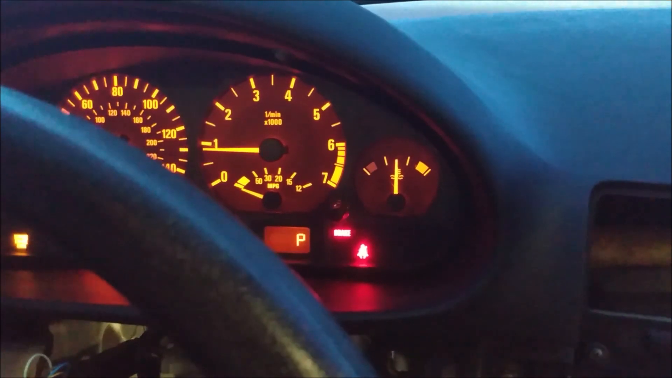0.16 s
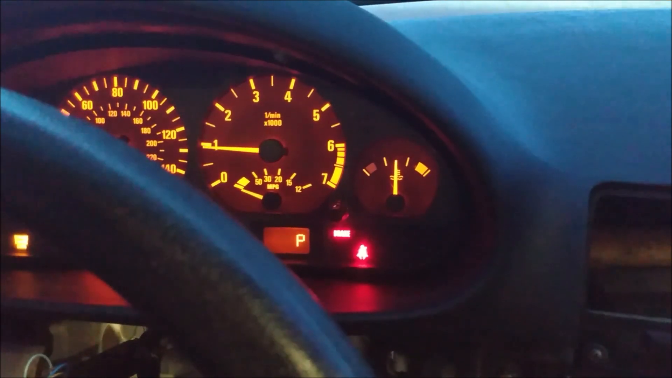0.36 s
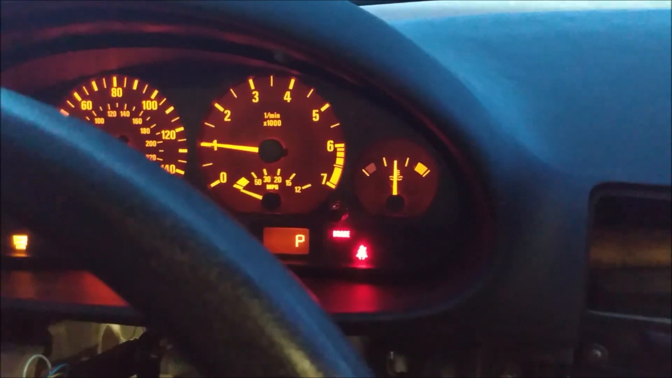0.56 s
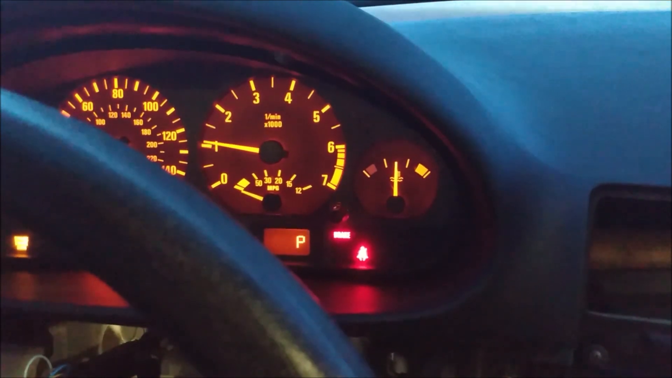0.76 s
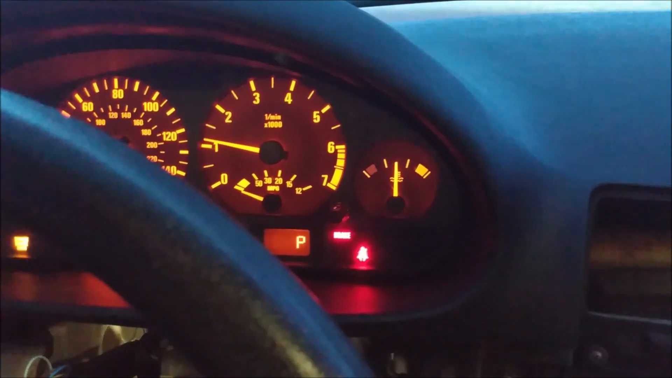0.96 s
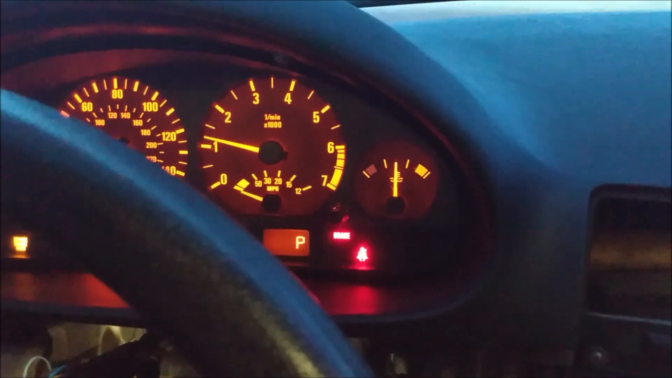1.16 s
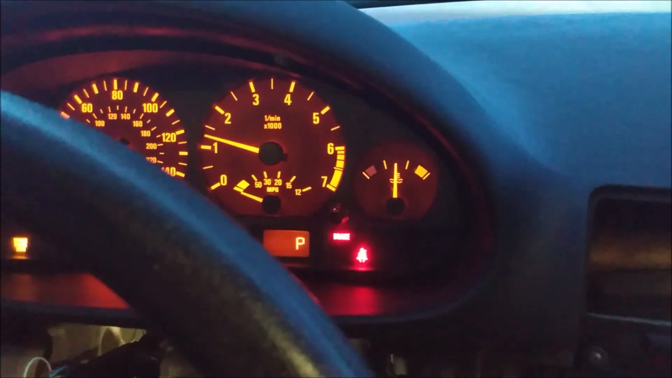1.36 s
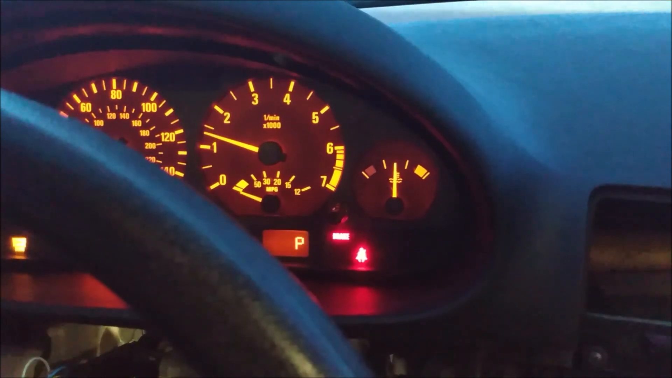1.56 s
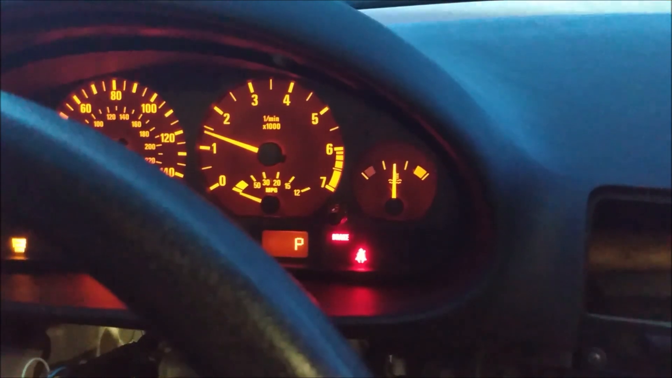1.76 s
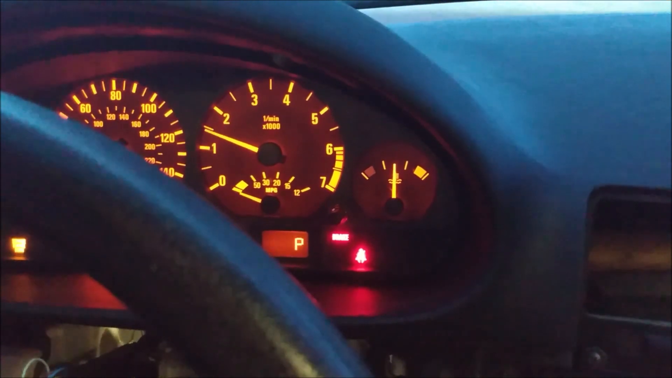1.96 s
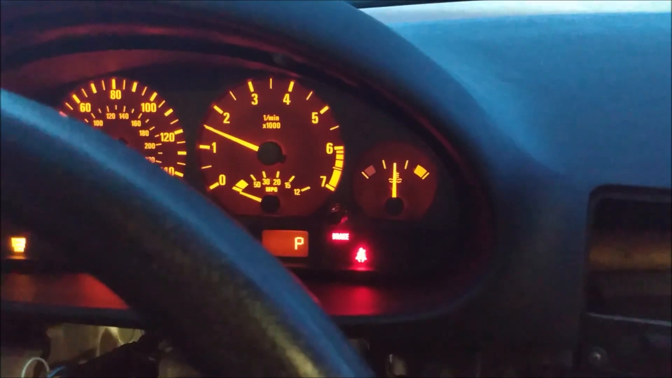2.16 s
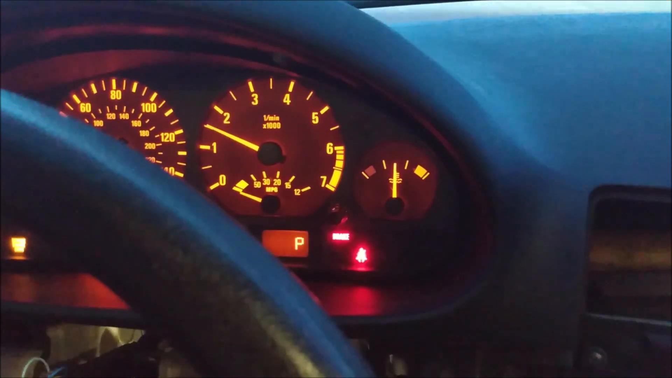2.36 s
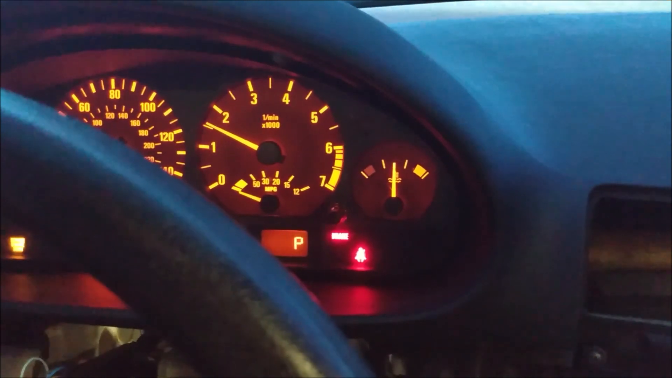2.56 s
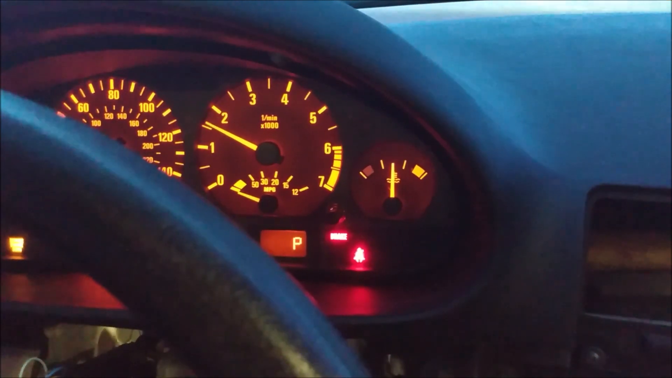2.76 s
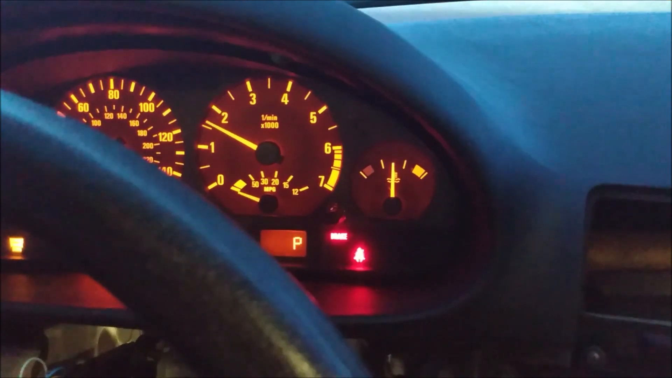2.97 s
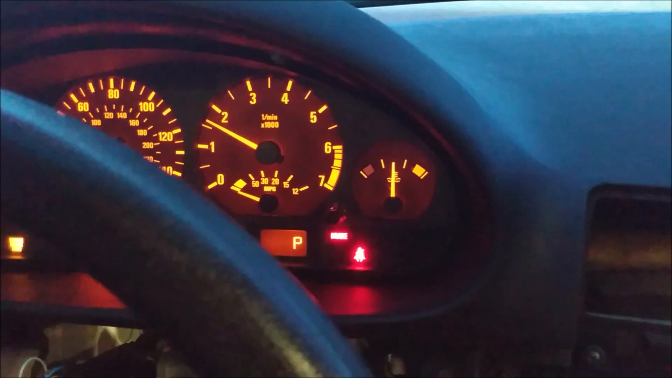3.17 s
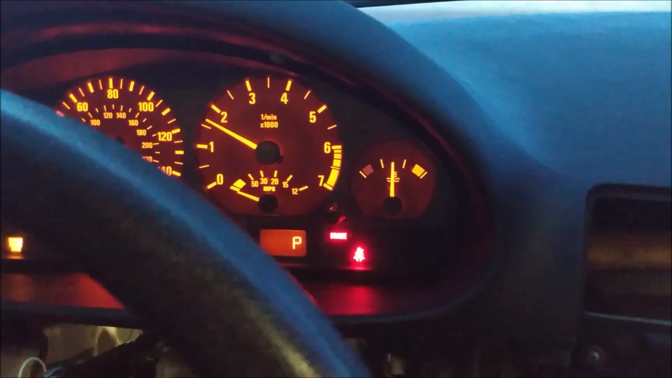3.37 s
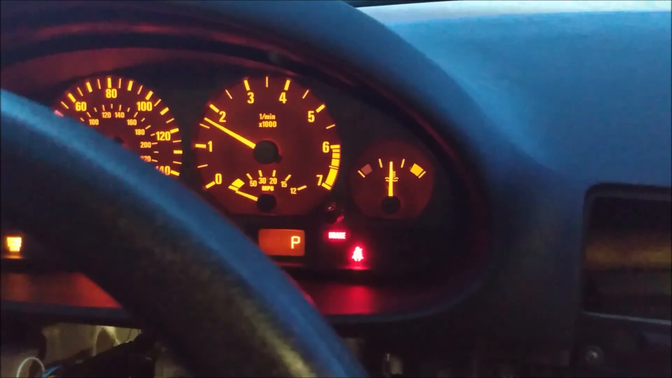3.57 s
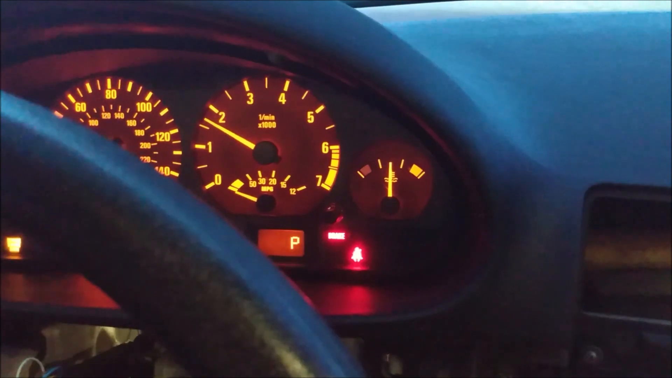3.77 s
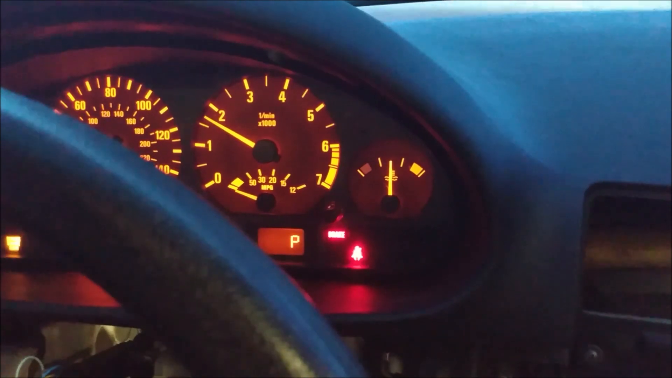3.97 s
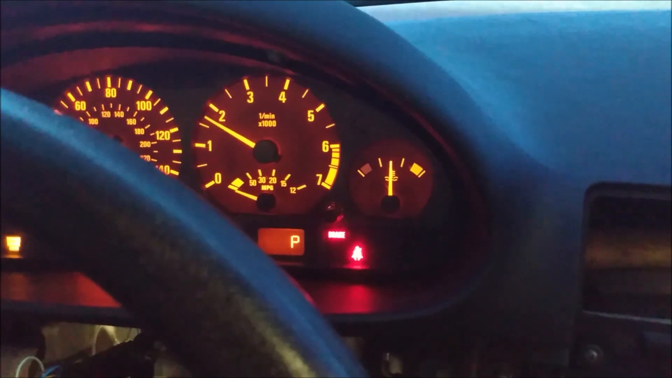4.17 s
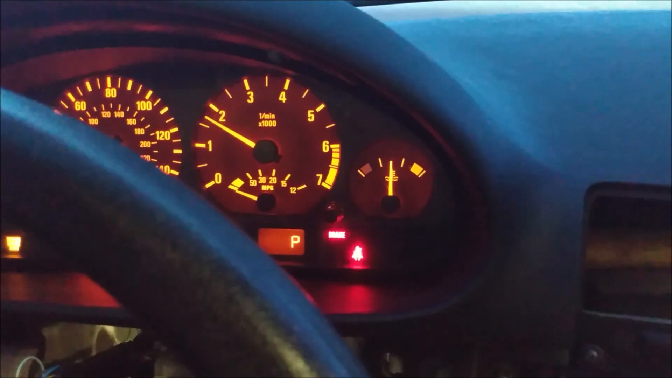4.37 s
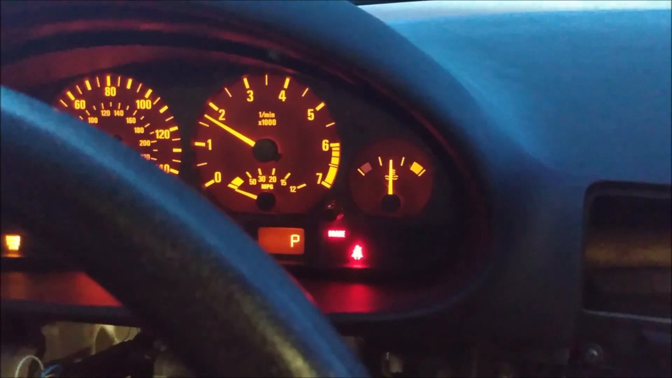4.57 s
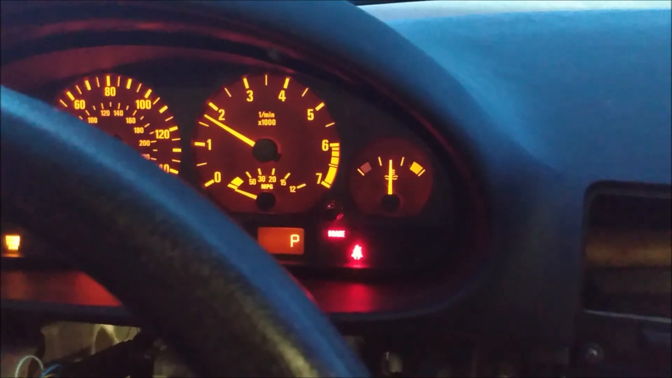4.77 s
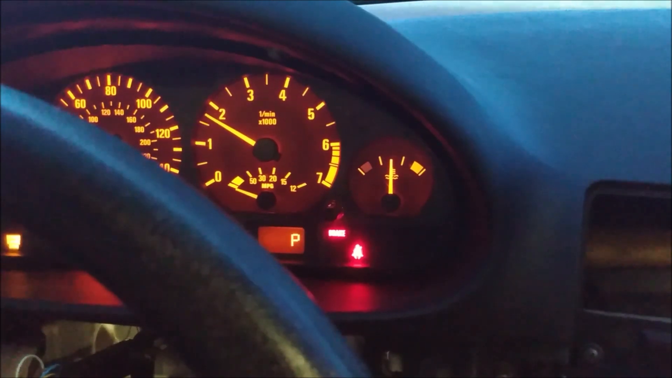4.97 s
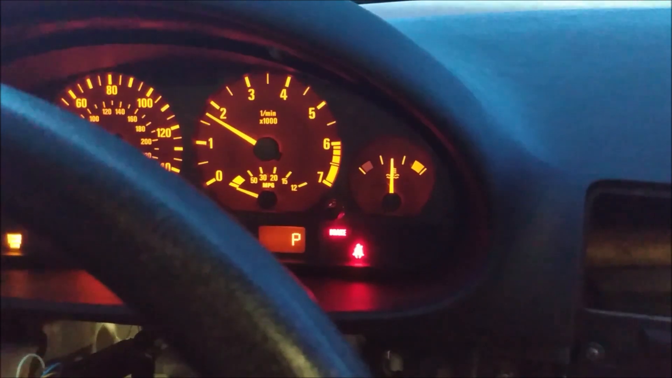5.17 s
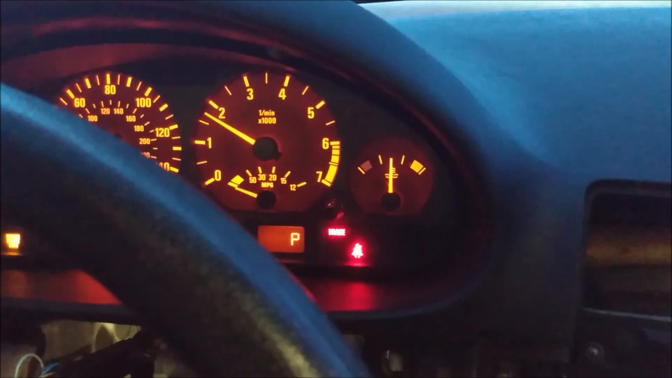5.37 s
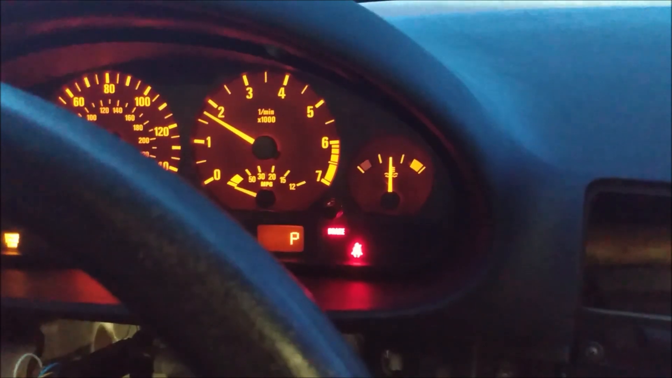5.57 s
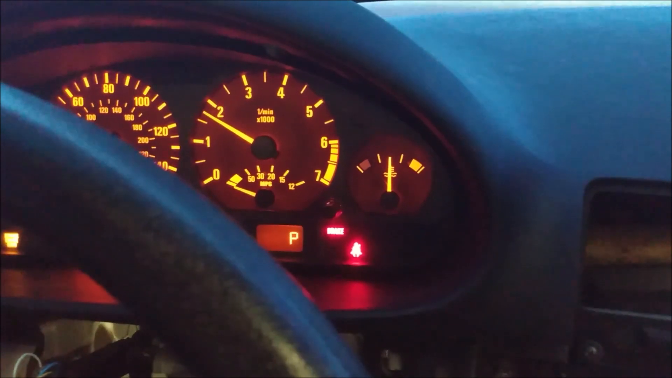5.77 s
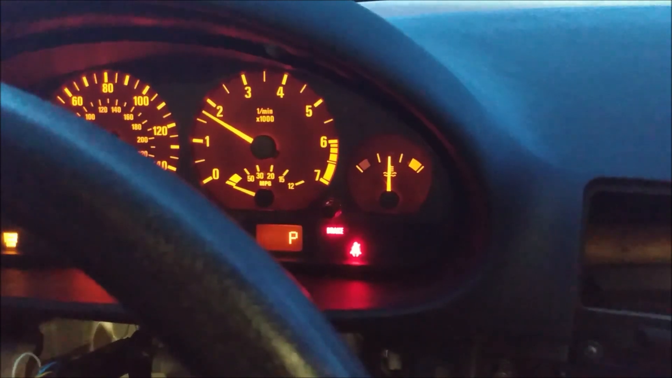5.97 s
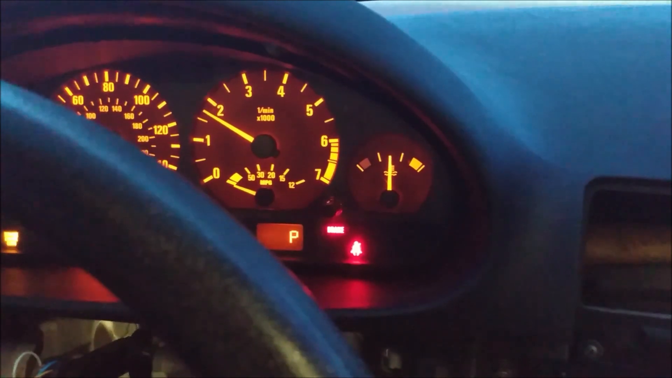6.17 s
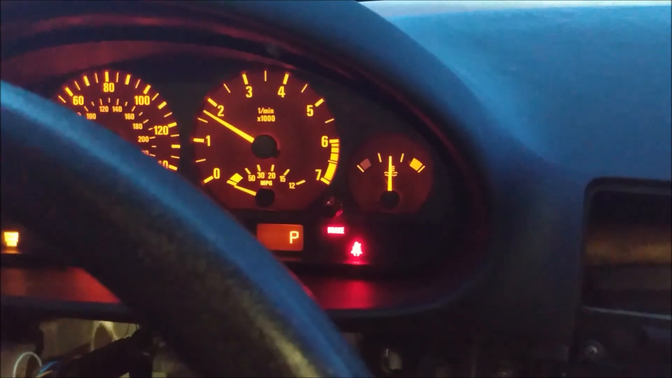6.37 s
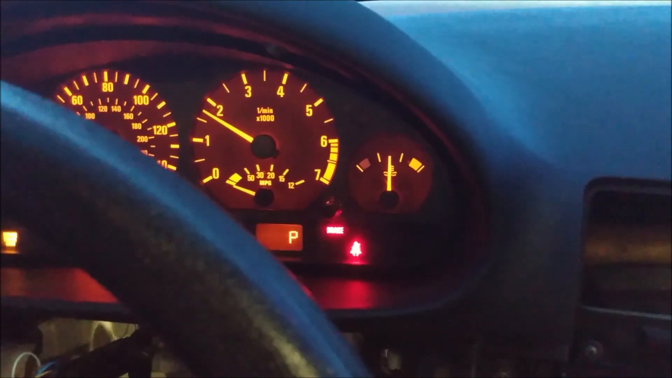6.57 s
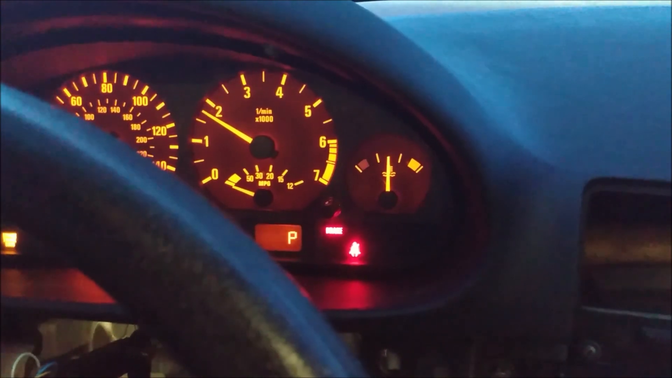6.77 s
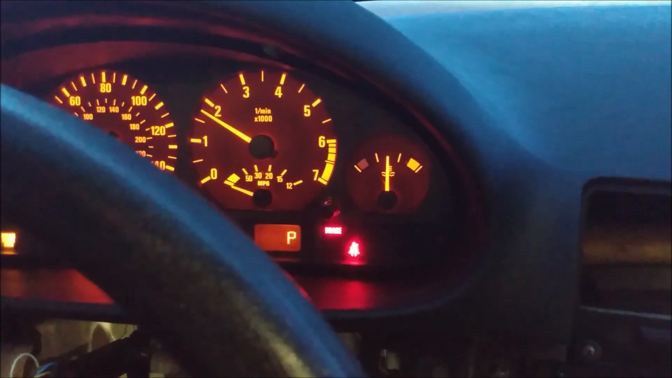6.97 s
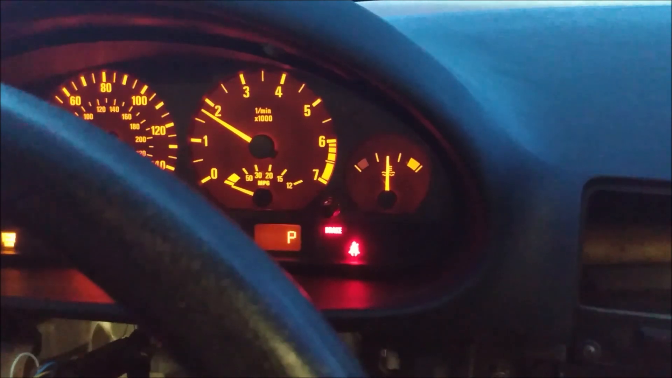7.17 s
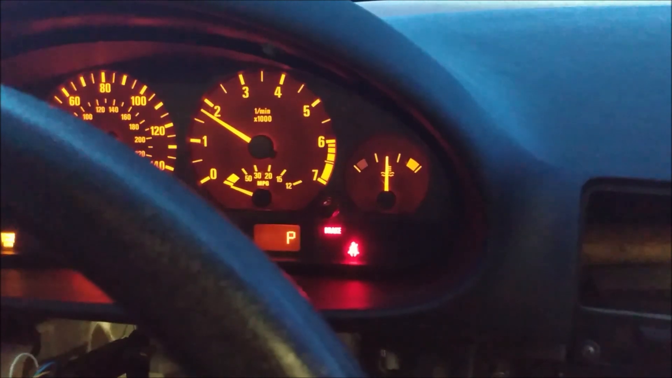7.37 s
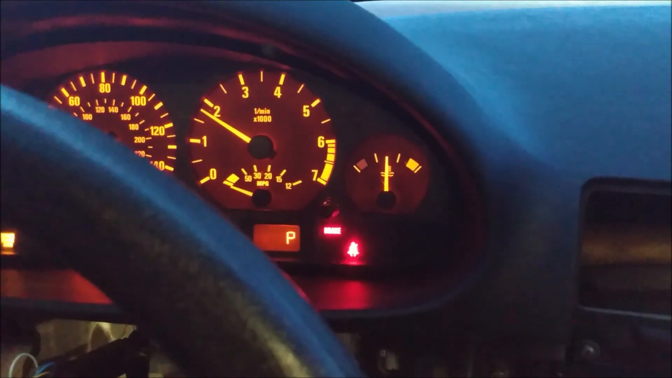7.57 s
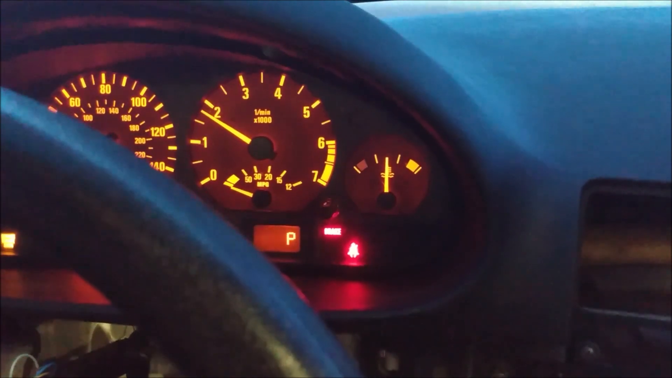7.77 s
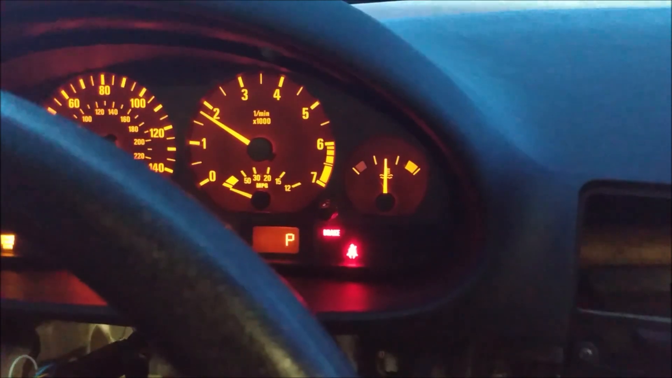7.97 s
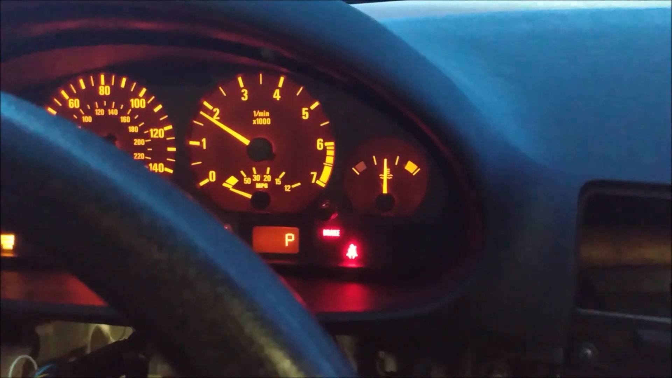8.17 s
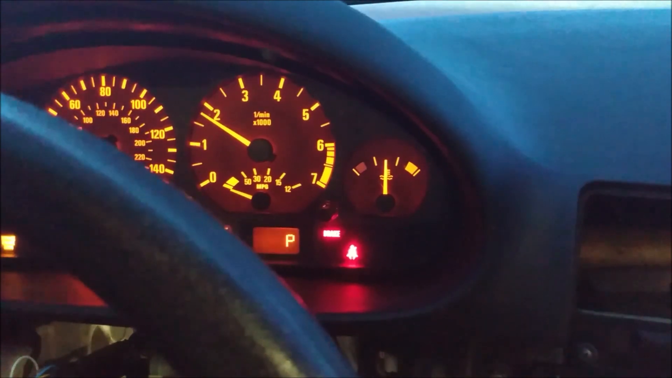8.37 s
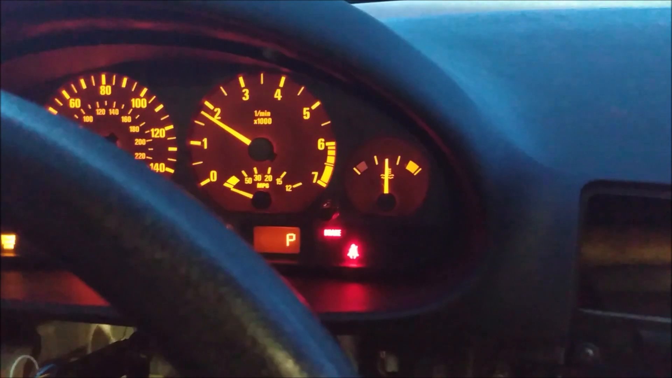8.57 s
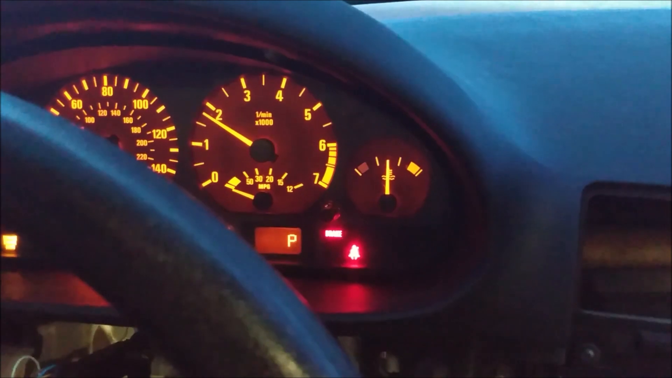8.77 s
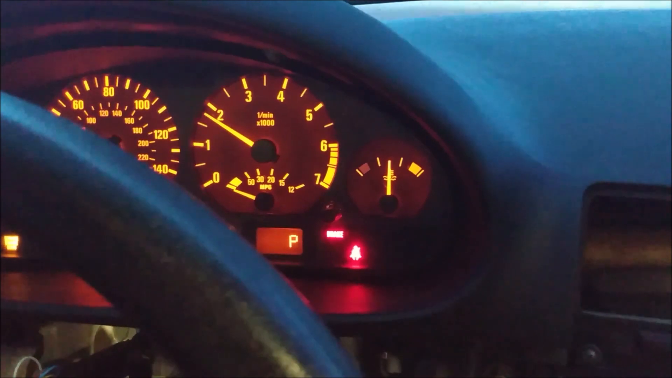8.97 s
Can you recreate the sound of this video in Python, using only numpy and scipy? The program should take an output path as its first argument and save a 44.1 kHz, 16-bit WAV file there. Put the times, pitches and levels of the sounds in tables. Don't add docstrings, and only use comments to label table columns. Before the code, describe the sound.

A car engine revs up from idle over three seconds, swelling through cabin booms, then holds a constant buzzing hum with soft uneven surges.

```python
import sys
import numpy as np
from scipy import signal
from scipy.fft import rfft, irfft, next_fast_len
from scipy.io import wavfile
from scipy.ndimage import uniform_filter1d

SR = 44100
rng = np.random.default_rng(int(sys.argv[2]) if len(sys.argv) > 2 else 0)


def master(y):
    cut = np.clip(np.atleast_2d(y).T, -1, 1)
    pcm = np.round(cut * 32767)
    wavfile.write(sys.argv[1], SR, pcm.astype(np.int16))


def volts_from_db(level):
    exponent = np.asarray(level, float) / 20
    return 10 ** exponent


N = 398223
T = np.arange(N) / SR
SLOW = 8
T_SLOW = T[::SLOW]

# (time [s], firing rate [Hz])
REV = [(0, 44.23), (.3, 47.82), (.45, 50.5), (.7, 56.87), (.9, 60.45), (1.2, 64.76), (1.5, 69.66),
       (1.7, 72.39), (2.4, 81.1), (2.7, 84.3), (3.0, 86.15), (3.85, 89.33), (4.55, 90.45), (5.95, 91.02),
       (6.4, 90.75), (7.0, 92.0), (7.6, 93.55), (9.03, 93.25)]
CYLINDERS, HELD_HZ, INERTIA_S = 6, 91, 0.15
SPEED_DB = 9.5

# (time [s], level [dB])
FIRING = [(0, -37), (.2, -38), (.5, -47), (.7, -34.5), (.92, -27), (1.17, -24), (1.3, -33), (1.58, -30),
          (1.74, -39.5), (2.0, -33), (2.45, -35.5), (2.72, -32.5), (3.07, -40), (3.29, -32.5), (3.5, -37),
          (4.9, -35), (7.32, -35), (7.65, -31.2)]
# (multiple of firing rate), (level over the plain exhaust path [dB])
OVERTONES = (2, 3, 6)
OVERTONE_DB = (-57, -63.5, -66.5)
# (centre [Hz], width [Hz], level over the plain path [dB])
EXHAUST = [(96, 39, 15), (152.65, 13.6, 31.5), (159.94, 8.8, 32.5), (206, 13, 11), (256.9, 22.6, 20),
           (341, 36, 11), (388.6, 14, 21), (473, 81, 11.5), (526, 12, 12.5), (562.5, 47, 13.5)]
# (fade starts [s], fade ends [s])
IDLE_ENDS_S = (.44, .54)
IDLE_DB = 33
NULL_CENTRE_HZ, NULL_WIDTH_HZ, NULL_DB = 165.9, 6.1, 13.5

CYCLE_ORDERS = (3, 4, 7, 8, 9, 10, 13, 14, 15, 16, 17, 19, 20, 21, 22, 24, 26, 27, 28, 33, 75, 39, 42, 44,
                45, 51, 57, 63, 66, 72)
# (level at held speed [dB], change once the trim buzzes [dB], left minus right [dB])
CYCLE = [(-43.5, -1.5, 0), (-49.5, 1.5, 0.5), (-67.5, 11, -8), (-69.5, -8, 4), (-55, -10, -5),
         (-48, -1.4, 0), (-56, -0.5, 5), (-50, 1.5, 0), (-65.5, 2.5, 4), (-68.5, 10, -2), (-46, -0.5, -3),
         (-67, 1, -4), (-64.5, 8, 0), (-54, 1.1, 2.5), (-67.5, 7, 2), (-65.5, -5.5, 0.5), (-66, -3.5, 10),
         (-67, -15, 7), (-68, -2, 4), (-62.5, 4, -1), (-70, -13, -3.5), (-67.5, -3, -5.5), (-68, 7, 3),
         (-76, 12.5, -4.5), (-63.5, -5, 6), (-73, 9.5, -0.5), (-67, -9, 3), (-73, 10, -13), (-68, -1, -1),
         (-71, 14, 11.5)]
# (start [s], full [s])
BUZZ_S = (7.04, 7.44)
# (centre [Hz], width [Hz], level over the plain path [dB])
CABIN = [(64, 8, 18.5), (88, 18, 16), (153.2, 13.4, 22.5), (209.5, 29.5, 11), (257.3, 19, 14),
         (320.5, 16.6, 4.5), (391.8, 20.2, 12.5), (533, 146, 2), (699.5, 33, 10), (787, 17, 9),
         (1029, 130, 2.5), (1250, 71, 4)]
LOW_CUT_HZ = 41

PULL_ORDERS = (5, 11, 15, 20, 23, 30, 33, 48)
# (level at held speed [dB], extra under load [dB])
PULL = [(-77.5, 1.7), (-59.5, 4.2), (-73, 17.6), (-80, 7.1), (-77.5, 12), (-85.5, 12), (-85.5, 4.9),
        (-87.5, 13.3)]
# (load starts to ease [s], load gone [s])
PULL_ENDS_S = (2.4, 3.6)

FLARE_ORDERS = (21, 72, 24, 72, 108, 21, 54, 28, 72, 11, 20, 108, 19, 42, 30, 30, 28, 20, 12, 36, 15, 42)
# (centre time [s], level [dB], half length [s])
FLARES = [(0.09, -35.5, 0.089), (.35, -62.5, .2), (1.29, -46, 0.14), (1.25, -55, 0.046),
          (1.62, -62.5, 0.18), (1.52, -55, 0.37), (2.05, -53, 0.033), (2, -60.5, 0.31), (2.8, -65, .3),
          (2.75, -45.5, 0.36), (0.12, -59, 0.13), (4.27, -66, 0.3), (.35, -47, 0.036), (2.7, -63, 0.3),
          (1.97, -61, .08), (2.29, -55.5, 0.1), (2.88, -54, .13), (2.2, -53, 0.32), (0.56, -56, .05),
          (0.44, -59, 0.071), (1.0, -38.5, 0.203), (3, -63.5, .3)]

GEAR_ORDERS = range(85, 140)
GEAR_DB, GEAR_FALL_DB, GEAR_SCATTER_DB = -76.5, -0.0842, 2.2

FAINT_ORDERS = [k for k in range(25, 85) if k not in CYCLE_ORDERS and k != 36]
FAINT_DB, FAINT_LOAD_DB, FAINT_SCATTER_DB, FAINT_SIDE_DB = -76.5, -3.5, 4, 8
HALF_FIRING_DB = 5

# (centre [Hz], width [Hz], level [dB])
PANELS = [(60.6, 15.5, -47.5), (155.4, 11, -51.5), (214.6, 31, -58), (258.7, 32, -59), (334, 100, -64.5)]
# (frequency [Hz], density [dB per Hz])
RUSH = [(25, -17), (45, -12), (95, 18.5), (125, -5), (200, -0.5), (300, 0.5), (500, 1.5), (700, 3),
        (900, -2.5), (1300, 1), (1740, -3), (2500, -4.5), (3700, -13), (7000, -29.5)]
# (centre [Hz], width [Hz], level [dB])
COVERS = [(973, 58, -1.5), (1512, 10, 11.5), (2144, 11, 4), (2754, 135, -1), (4510, 1100, -4.5)]
# (frequency [Hz], density [dB per Hz])
HISS = [(3530, -14), (6000, -6), (8060, -9), (11400, -0.5), (13500, -7), (15200, -1), (16000, -13)]
TOP_HZ = 15720
RUSH_DB, HISS_DB = 8, 3
RUSH_HELD_DB, RUSH_SPEED_DB = -57, 6.5
HISS_HELD_DB, HISS_SPEED_DB = -68, 6.7

# (frequency [Hz], left minus right [dB])
TILT_DB = [(60, 3), (110, 2.5), (200, -2), (380, -8.5), (700, -0.5), (1290, -1), (2380, 0.5), (4400, 3.5),
           (8120, 4), (15000, -1)]
# (frequency [Hz], shared part [0-1])
LIKENESS = [(60, 0.98), (250, 1), (640, 0.87), (1030, 0.38), (1720, 0.37), (3200, 0.047), (6000, 0.05),
            (15000, .12)]
# (frequency [Hz], lead of the left port [rad])
LEAD = [(60, .04), (250, .15), (640, 0.15), (1030, 1.36), (1720, 3.07), (3200, 1.95), (6000, 5.3),
        (15000, 3.1)]
PORT_LAG_S = 1.0e-4
IN_STEP_HZ = 200

# (time [s], level [dB], centre [Hz], width [Hz], length [s])
HAND = [
    (0.3535, -54, 11500, 9000, 0.00076),
    (.7, -66.5, 2760, 300, 0.19),
    (2.59, -66, 5900, 6970, 0.023),
    (4.27, -67, 5955, 6987, .025),
    (6.773, -71, 9000, 8000, 0.022),
    (7.21, -64, 4800, 6040, 0.023),
    (8.76, -73, 1200, 2000, .02),
]

# (multiple of cycle rate), (level against surge [dB])
BOOM_ORDERS = (4, 10)
BOOM_DB = (-0.5, -4)
BOOM_FROM_S, SURGE_S = 2.8, 0.093
# (time [s], level [dB])
SURGES = [(2.84, -52), (3.26, -43), (3.47, -42), (3.75, -47.5), (3.97, -37), (4.28, -38.5), (4.55, -39),
          (4.76, -42.5), (4.98, -36), (5.28, -37.5), (5.63, -41), (5.82, -38.5), (5.97, -38.5), (6.34, -36),
          (6.52, -37.5), (6.77, -43), (6.98, -39), (7.2, -38.5), (7.47, -44), (7.63, -35.5), (7.96, -36),
          (8.2, -41.5), (8.37, -38.5), (8.77, -41), (8.99, -45)]


def read(table, hz):
    f, value = np.transpose(table)
    return np.interp(np.log(hz), np.log(f), value)


def walk(rate, size=N, sr=SR):
    k = int(sr / rate)
    steps = np.repeat(rng.standard_normal(size // k + 1), k)
    return 1.12 * uniform_filter1d(uniform_filter1d(steps, k), k)[:size]


def peak(hz, centre_hz, width_hz):
    return 1 / np.sqrt(1 + ((hz - centre_hz ** 2 / hz) / width_hz) ** 2)


def shaped(gain):
    size = next_fast_len(N)
    hz = np.maximum(np.arange(size // 2 + 1) * SR / size, 1)
    both, left, right = rfft(rng.standard_normal((3, size))) * gain(hz)
    share = np.clip(read(LIKENESS, hz), 0, 1)
    common, own = np.sqrt(share) * both, np.sqrt(1 - share)
    turn = np.exp(0.5j * read(LEAD, hz))
    tilt = volts_from_db(read(TILT_DB, hz) / 2)
    left = (common * turn + own * left) * tilt
    right = (common / turn + own * right) / tilt
    pair = irfft(np.array([left, right]), size)[:, :N]
    return pair / np.sqrt(np.mean(pair ** 2))


def crankshaft():
    firing_hz = np.interp(T_SLOW, *np.transpose(REV))
    cycle_hz = uniform_filter1d(firing_hz, int(INERTIA_S * SR / SLOW), mode="nearest") / CYLINDERS
    turns = np.cumsum(cycle_hz) * SLOW / SR
    return cycle_hz, turns, np.log2(cycle_hz * CYLINDERS / HELD_HZ)


def load():
    return np.interp(T_SLOW, PULL_ENDS_S, (1, 0))


def cabin(hz):
    booms = 1 + sum((volts_from_db(db) * peak(hz, f, w) ** 2) ** 2 for f, w, db in CABIN)
    return np.sqrt(booms / (1 + (LOW_CUT_HZ / hz) ** 9))


def sweep_db(k, cycle_hz):
    return 20 * np.log10(cabin(k * cycle_hz) / cabin(k * HELD_HZ / CYLINDERS))


def tone(k, turns, cycle_hz, db, pan_db, wander_db):
    hz = k * cycle_hz
    scatter, spread = rng.uniform(-np.pi, np.pi), rng.standard_normal()
    start = scatter * min(hz[-1] / IN_STEP_HZ, 1)
    lag = 2 * np.pi * hz * PORT_LAG_S * (1 + 0.4 * spread) / 2
    angle = 2 * np.pi * k * turns + start
    size = np.sqrt(2) * volts_from_db(db + wander_db * walk(2.98, size=len(hz), sr=SR / SLOW))
    left = volts_from_db(pan_db / 2) * np.sin(angle + lag)
    right = volts_from_db(-pan_db / 2) * np.sin(angle - lag)
    return size * np.array([left, right])


def exhaust_db(hz, idle_db):
    rings = [(volts_from_db(db) * peak(hz, f, w) ** 3) ** 2 for f, w, db in EXHAUST]
    power = 1 + rings[0] * volts_from_db(2 * idle_db) + sum(rings[1:])
    return 10 * np.log10(power) - NULL_DB * peak(hz, NULL_CENTRE_HZ, NULL_WIDTH_HZ) ** 2


def firing(turns, cycle_hz):
    out = tone(CYLINDERS, turns, cycle_hz, np.interp(T_SLOW, *np.transpose(FIRING)), -0.073, 0)
    idle_db = np.interp(T_SLOW, IDLE_ENDS_S, (0, -IDLE_DB))
    for overtone, db in zip(OVERTONES, OVERTONE_DB):
        k = CYLINDERS * overtone
        out += tone(k, turns, cycle_hz, db + exhaust_db(k * cycle_hz, idle_db), -0.087, 0)
    return out


def uneven_cylinders(turns, cycle_hz, speed_db):
    out = 0
    buzz = np.interp(T_SLOW, BUZZ_S, (0, 1))
    arrived = np.clip((T_SLOW - BOOM_FROM_S) / 0.27, 0, 1)
    surge = surge_db()
    for k, (db, buzz_db, pan_db) in zip(CYCLE_ORDERS, CYCLE):
        level_db = db + sweep_db(k, cycle_hz) + speed_db + buzz_db * buzz
        wander_db = 1.2 + 1.3 * load()
        if k in BOOM_ORDERS:
            boom_db = surge + BOOM_DB[BOOM_ORDERS.index(k)]
            level_db += arrived * (boom_db - level_db)
            wander_db = 0
        out += tone(k, turns, cycle_hz, level_db, pan_db, wander_db)
    return out


def faint_lines(turns, cycle_hz, speed_db):
    out = 0
    for k in FAINT_ORDERS:
        scatter_db, pan_db = rng.standard_normal(2) * (FAINT_SCATTER_DB, FAINT_SIDE_DB)
        db = FAINT_DB + HALF_FIRING_DB * (k % 3 == 0) + FAINT_LOAD_DB * load() + scatter_db
        out += tone(k, turns, cycle_hz, db + sweep_db(k, cycle_hz) + speed_db, pan_db, 2.5)
    return out


def valve_gear(turns, cycle_hz, speed_db):
    out = 0
    for k in GEAR_ORDERS:
        fall_db = GEAR_FALL_DB * (k - GEAR_ORDERS[0])
        db = GEAR_DB + fall_db + GEAR_SCATTER_DB * rng.standard_normal()
        out += tone(k, turns, cycle_hz, db + speed_db, 3.0 * rng.standard_normal(), 2.5)
    return out


def pulling(turns, cycle_hz):
    out = 0
    for k, (db, load_db) in zip(PULL_ORDERS, PULL):
        out += tone(k, turns, cycle_hz, db + sweep_db(k, cycle_hz) + load_db * load(), 0, 0.55)
    return out


def flares(turns, cycle_hz):
    out = 0
    for k, (centre, db, half) in zip(FLARE_ORDERS, FLARES):
        out += tone(k, turns, cycle_hz, db - 6 * ((T_SLOW - centre) / half) ** 2, 0, 0)
    return out


def engine(turns, cycle_hz, doublings):
    speed_db = SPEED_DB * doublings
    lines = firing(turns, cycle_hz)
    lines += uneven_cylinders(turns, cycle_hz, speed_db)
    lines += faint_lines(turns, cycle_hz, speed_db)
    lines += valve_gear(turns, cycle_hz, speed_db)
    lines += pulling(turns, cycle_hz) + flares(turns, cycle_hz)
    return signal.resample_poly(lines, SLOW, 1, axis=1)[:, :N]


def panels():
    out = 0
    for f, w, db in PANELS:
        out += volts_from_db(db + 1.5 * walk(2.5)) * shaped(lambda hz: peak(hz, f, w) ** 2)
    return out


def rush(turns, db):
    cycle_throb = 0.027 * np.sin(2 * np.pi * turns)
    firing_throb = 0.042 * np.sin(2 * np.pi * CYLINDERS * turns)

    def gain(hz):
        ring = 1 + sum(volts_from_db(cover_db) * peak(hz, f, w) ** 2 for f, w, cover_db in COVERS)
        return volts_from_db(read(RUSH, hz)) * ring * (hz < 9000)

    return shaped(gain) * (1 + cycle_throb + firing_throb) * volts_from_db(db + RUSH_DB + 0.45 * walk(6))


def hiss(db):
    noise = shaped(lambda hz: volts_from_db(read(HISS, hz)) * (hz >= HISS[0][0]) * (hz < TOP_HZ))
    return noise * volts_from_db(db + HISS_DB + 0.45 * walk(5))


def hand():
    out = 0
    for s, db, f, w, length in HAND:
        swell = np.exp(-0.5 * ((T - s) / length) ** 2)
        out += volts_from_db(db) * swell * shaped(lambda hz: peak(hz, f, w) ** 2 * (hz < TOP_HZ))
    return out


def surge_db():
    power = sum(volts_from_db(2 * db) * np.exp(-((T_SLOW - s) / SURGE_S) ** 2) for s, db in SURGES)
    return 10 * np.log10(1e-9 + power)


def scene():
    cycle_hz, turns, doublings = crankshaft()
    lines = engine(turns, cycle_hz, doublings)
    turns, doublings = np.interp(T, T_SLOW, turns), np.interp(T, T_SLOW, doublings)
    rush_db = RUSH_HELD_DB + RUSH_SPEED_DB * doublings
    hiss_db = HISS_HELD_DB + HISS_SPEED_DB * doublings
    return lines + panels() + rush(turns, rush_db) + hiss(hiss_db) + hand()


def band_limit(x):
    return signal.sosfilt(signal.butter(12, 16860, fs=SR, output="sos"), x)


def record(dry):
    return band_limit(dry)


dry = scene()
out = record(dry)
master(out)
```